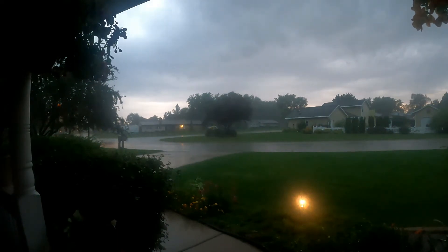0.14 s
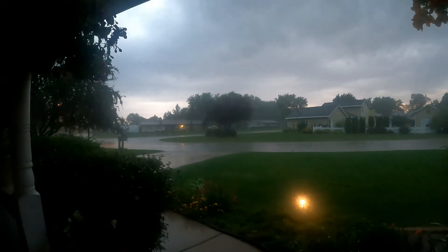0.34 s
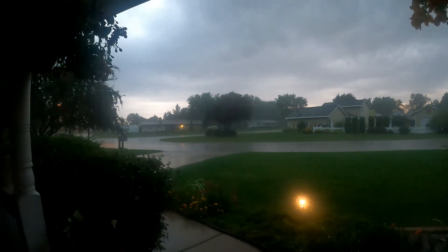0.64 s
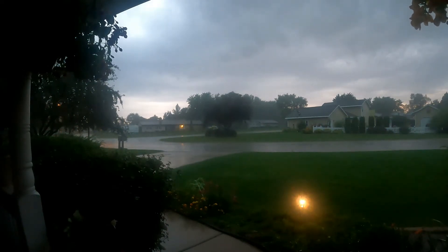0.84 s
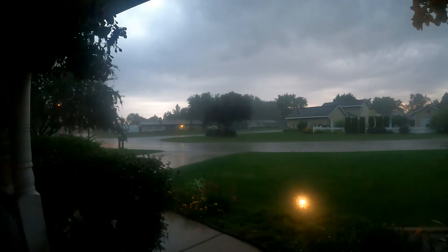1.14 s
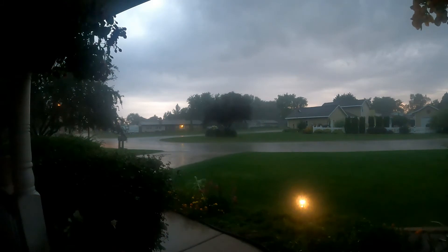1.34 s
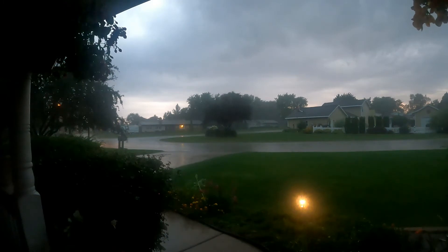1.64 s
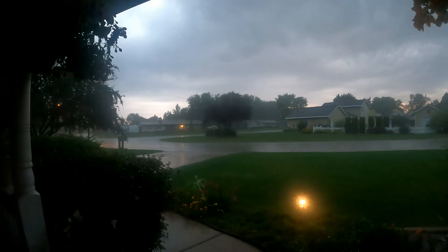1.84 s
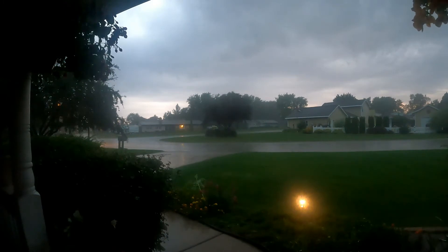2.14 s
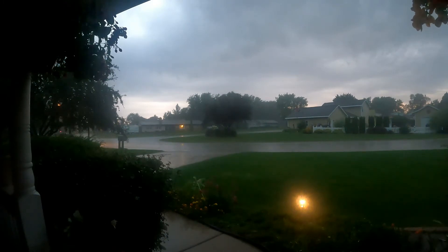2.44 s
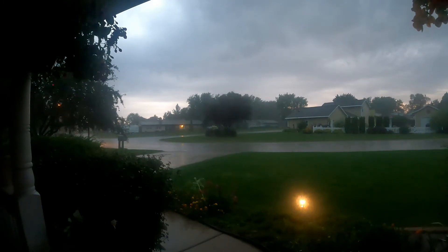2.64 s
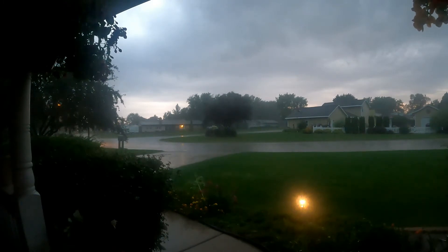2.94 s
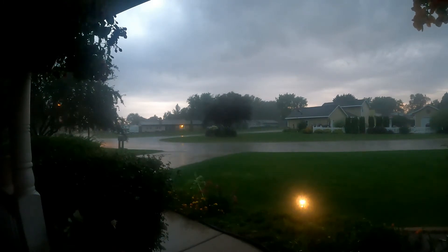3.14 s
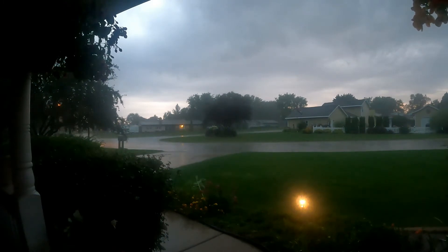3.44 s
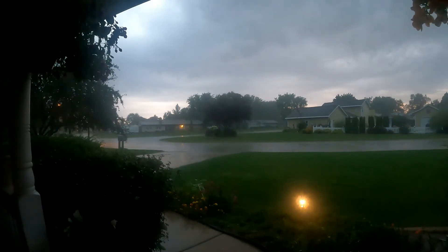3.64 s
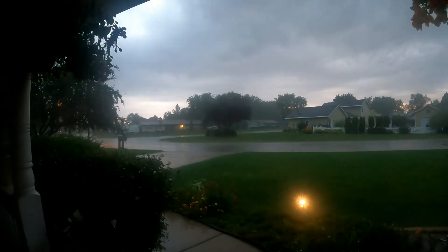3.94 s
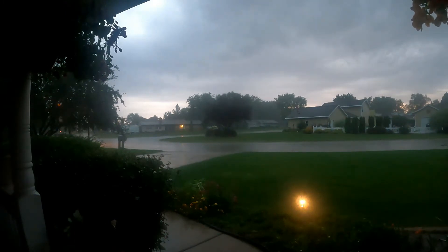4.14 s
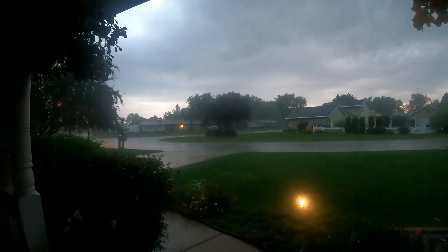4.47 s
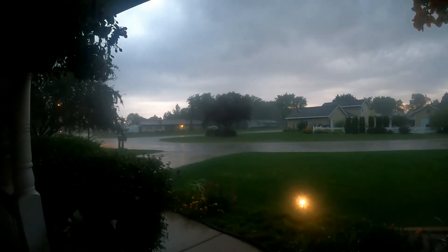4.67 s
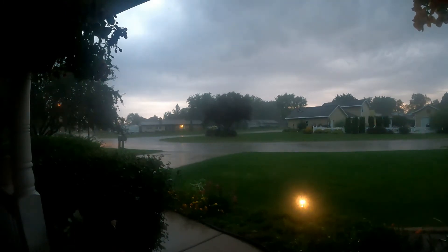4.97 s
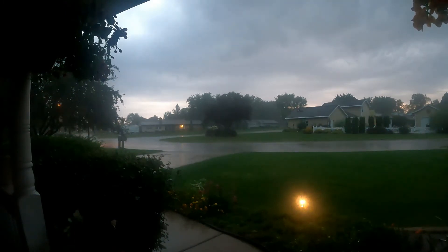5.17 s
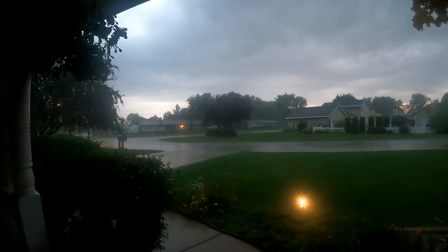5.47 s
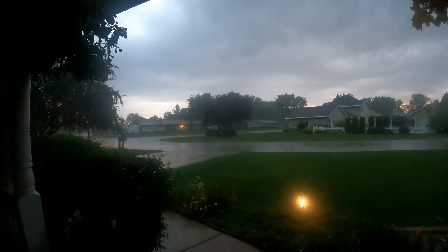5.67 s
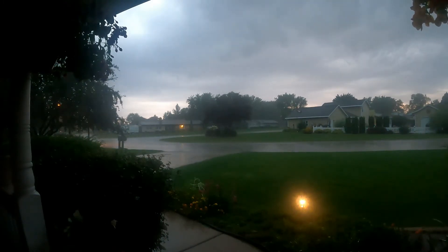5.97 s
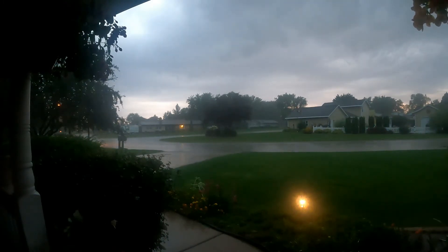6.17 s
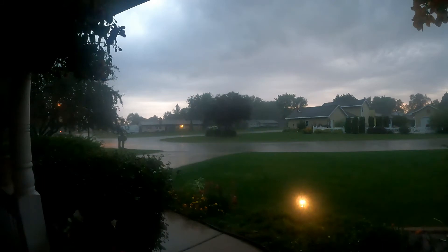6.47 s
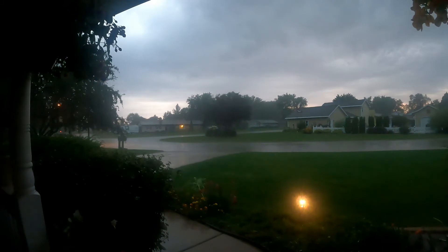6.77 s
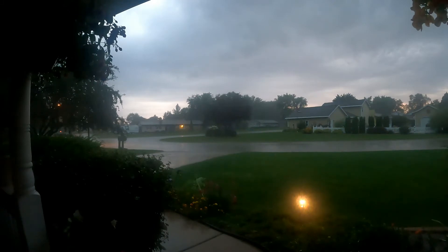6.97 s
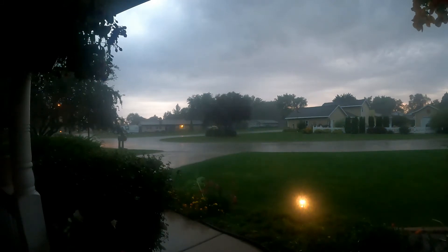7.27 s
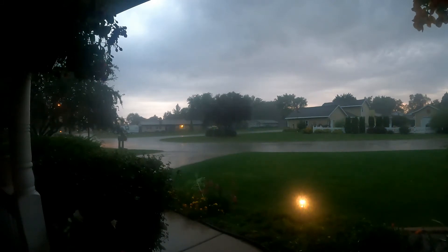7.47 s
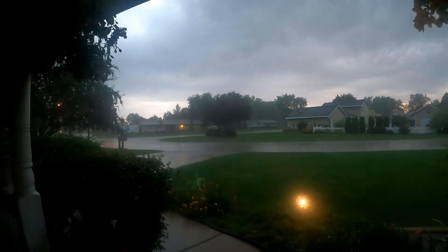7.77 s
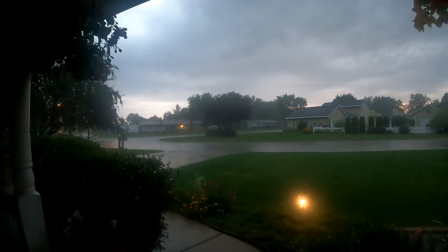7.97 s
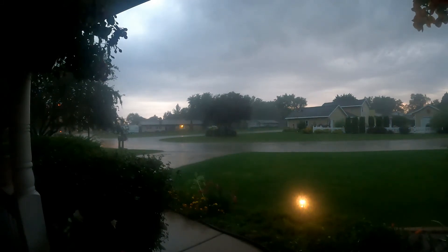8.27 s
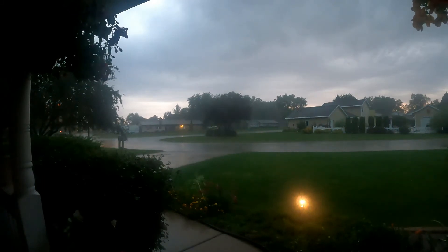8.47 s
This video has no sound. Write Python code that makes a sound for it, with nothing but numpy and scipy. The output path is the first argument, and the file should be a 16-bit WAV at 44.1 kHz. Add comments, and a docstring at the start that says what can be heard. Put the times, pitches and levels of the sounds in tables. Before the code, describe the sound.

Heard from a sheltered porch, heavy rain falls without pause on grass, leaves and wet paving: a broad soft hiss with fine, clumpy pattering. Close drops click and splash irregularly. After the first second distant thunder rolls in, deep and boomy, peaking near two and again near seven seconds, then fading.

```python
"""Heavy rain on a lawn, bushes and a street, heard from a covered porch.
Throughout, far drops merge into a hiss of flickering noise bands, and nearer ones patter as short rings.
Close drops click and splash from the first moment, hardest near 5.3 and 7.4 s.
Distant thunder, noise through low resonances, swells after the first second, peaks near 2 and 6.8 s
and fades at the end; it makes the recorder's gain control lower the rain."""
import sys
import numpy as np
from scipy import signal
from scipy.fft import rfft, irfft, next_fast_len
from scipy.io import wavfile
from scipy.ndimage import uniform_filter1d

SR = 44100
rng = np.random.default_rng(int(sys.argv[2]) if len(sys.argv) > 2 else 0)


def ratio(d):
    """dB to gain"""
    e = np.asarray(d, float) / 20
    return 10 ** e


def materialize(psi):
    """Save the field psi as 16-bit PCM at rate SR to the path in sys.argv[1].

    A 1-D psi becomes a single channel; in a 2-D psi each row is a channel.
    """
    bounded = np.clip(np.atleast_2d(psi).T, -1, 1)
    quanta = np.round(bounded * 32767).astype(np.int16)
    wavfile.write(sys.argv[1], SR, quanta)


N = 379701  # samples


def unit_power(x):
    """Normalization: scale a signal to a mean square of 1."""
    return x / np.sqrt(np.mean(x ** 2) + 1e-20)


def in_time(rows):
    """Linear interpolation: each column after the time becomes a curve with one value a sample."""
    seconds, *columns = np.transpose(rows)
    return [np.interp(np.arange(N) / SR, seconds, column) for column in columns]


def at_hz(points, hz):
    """Logarithmic frequency axis: interpolate a spectrum between its points."""
    point_hz, values = np.transpose(points)
    return np.interp(np.log(hz + 1), np.log(point_hz), values)


def drift(corner_hz):
    """Low-passed noise: two equal poles leave a slow random curve of spread 1."""
    step = 40  # samples between computed values
    pole = np.exp(-2 * np.pi * corner_hz * step / SR)
    noise = rng.standard_normal(N // step + 2002)
    slow = signal.lfilter([1], [1, -2 * pole, pole * pole], noise)[2000:]  # settled part
    return np.interp(np.arange(N) / step, np.arange(len(slow)), unit_power(slow))


def ring(x, hz, t60):
    """Damped resonance: a unit click starts a sine of height 1 that falls 60 dB in t60 seconds."""
    radius, angle = ratio(-60 / (t60 * SR)), 2 * np.pi * hz / SR
    return signal.lfilter([0, np.sin(angle)], [1, -2 * radius * np.cos(angle), radius ** 2], x + 1e-18)


def sides(db):
    """Interaural level difference: left and right gains that lie db apart."""
    return ratio(np.array([db / 2, -db / 2]))


# Reflections from porch walls, floor and ceiling.
# Each row: delay in seconds, left level in dB, right level in dB; both shift with echo_db.
PORCH_ECHOES = [(.0016, -8, -9), (.0042, -11, -10), (.0057, -11, -13), (.0093, -15, -14), (.0154, -17, -18),
                (.024, -20, -20)]


def porch(x, echo_db):
    """Early reflection: hard surfaces nearby return a few delayed, weaker copies."""
    out = x.copy()
    for delay_s, left_db, right_db in PORCH_ECHOES:
        lag = round(delay_s * SR)
        out[:, lag:] += ratio(echo_db) * ratio([[left_db], [right_db]]) * x[:, :-lag]
    return out


# Course of the rain before the gain control. Each row: time in seconds, level in dB,
# near patter over far hiss in dB, extra body of the hiss in dB.
DOWNPOUR_COURSE = [(0, -37.5, -15, 1), (1, -37, -9, -0.1), (2, -36.5, -9, 0.6), (3.5, -37, -8, 0),
                   (5, -37.5, -8, -.5), (6.5, -36, -13, -0.3), (7.3, -37, -8.5, -0.5),
                   (7.9, -36.5, -12, -0.5), (8.3, -38.5, -7.5, 0.1), (8.61, -38, -19, 0)]
# Relative colour of the rain at the microphone. Each row: frequency in Hz, density in dB per Hz.
RAIN_COLOUR = [(150, -17), (210, -11.5), (300, -9), (435, -12.5), (613, -12.5), (860, -13.5), (910, -9),
               (1360, -12.5), (1910, -12), (2420, -13.5), (7600, -17.5), (8000, -22), (12100, -30.5),
               (14000, -43.5), (15000, -44)]
# Lean of the rain to one side. Each row: frequency in Hz, left over right in dB.
RAIN_LEANING = [(60, -12), (120, 17), (240, 0.5), (470, 1.0), (940, 1.5), (1870, 2), (3730, 0.5),
                (7430, 0.5), (14800, 7.5)]
# Phase between the microphones. Each row: frequency in Hz, lead of left over right in radians.
LEFT_LEAD = [(0, 0.1), (2760, -0.93), (5080, 0.06), (15000, 0.0)]


def rain():
    """Spectral shaping: hiss and patter share one colour, one phase difference and one level."""
    size = next_fast_len(N)
    hz = np.arange(size // 2 + 1) * SR / size
    low_cut = hz ** 4 / (hz ** 4 + 140 ** 4)
    colour = ratio(at_hz(RAIN_COLOUR, hz)) * sides(at_hz(RAIN_LEANING, hz)) * low_cut
    lead = np.interp(hz, *np.transpose(LEFT_LEAD))
    colour = colour * np.exp(0.5j * lead * [[1], [-1]])
    level_db, patter_db, body_db = in_time(DOWNPOUR_COURSE)
    flat = hiss(body_db) + ratio(patter_db) * patter()
    coloured = irfft(rfft(flat, size) * colour, size)[:, :N]
    return ratio(level_db) * unit_power(coloured)


# Coherence of the two channels of hiss. Each row: frequency in Hz, left-right likeness from 0 to 1.
HISS_LIKENESS = [(60, 0.99), (120, 1.0), (240, 0.96), (470, 0.9), (940, 0.74), (1870, 0.7), (3730, 0.65),
                 (7430, 0.64), (14800, 0.26)]


def hiss(body_db):
    """Superposition: countless far drops sum to noise, whose octave bands flicker partly together."""
    shared_db, own_db = 0.5, 0.5  # spread of the flicker
    size = next_fast_len(N)
    hz = np.arange(size // 2 + 1) * SR / size
    mid, side = rfft(rng.standard_normal((2, size)))
    alike = at_hz(HISS_LIKENESS, hz)
    pair = np.sqrt(1 + alike) * mid + np.sqrt(1 - alike) * side * [[1], [-1]]
    out, together = 0, drift(7.3)
    for centre_hz in 125 * 2.0 ** np.arange(8):
        # triangular on an octave axis, so that neighbouring bands sum to a flat spectrum
        band = np.clip(1 - np.abs(np.log2((hz + 1) / centre_hz)), 0, 1)
        gain_db = shared_db * together + own_db * drift(14.0)
        if centre_hz in (1000, 2000):
            gain_db = gain_db + body_db
        out = out + ratio(gain_db) * irfft(pair * band, size)[:, :N]
    return unit_power(out)


PATTER_PER_S, PATTER_SPREAD_DB = 500, 4.0  # rate before it wavers; mean of the random sizes
LOW_CYCLES, HIGH_CYCLES = 17, 3.2  # low drops plop like bubbles, high ones tick
CLUMP_DB, CLUMP_HZ = 4.0, 6.0  # swing of the clumps and corner of their drift


def patter():
    """Random arrivals: nearer drops on leaves and paving each ring a few cycles at a pitch and place."""
    sizes = ratio(PATTER_SPREAD_DB * np.minimum(rng.exponential(1, N), 4)) * rng.choice([-1, 1], N)
    places = sides(2.7 * rng.standard_normal(N))
    pitches = np.geomspace(500, 13000, 14)  # Hz
    cycles = np.geomspace(LOW_CYCLES, HIGH_CYCLES, len(pitches))
    dealt = rng.integers(0, len(pitches), N)
    # leaves shed water in clumps, each range of pitch at its own moments
    ranges = np.array([drift(CLUMP_HZ) for _ in range(5)])
    clumps = ranges[dealt // 3, np.arange(N)]
    rate = PATTER_PER_S * ratio(2.5 * drift(5.0) + CLUMP_DB * clumps)
    born = rng.random(N) < rate / SR
    rings = 0
    for k, hz in enumerate(pitches):
        clicks = places * sizes * born * (dealt == k)
        # small drops are many and high; the weight keeps the power per Hz level
        weight = hz / np.sqrt(cycles[k])
        rings = rings + weight * ring(clicks, hz, cycles[k] / hz)
    return unit_power(porch(rings, echo_db=-2))


# Drops close by, before echoes and treble loss. Each row: start in seconds, click peak in dB,
# pitch in Hz, left over right in dB, splash relative to the click in dB.
CLOSE_DROPS = [(0.04, -35, 1000, 0, -4), (0.135, -32.5, 1010, 0, -11), (0.255, -38, 910, 3, -7),
               (1.146, -23.5, 8200, 6, -7), (1.527, -28, 5090, -3, -12), (1.852, -21, 10100, 6, -7),
               (2.139, -29.5, 955, 5, -8.5), (2.469, -19, 7200, -1, -20), (2.564, -30.5, 1950, 1, -2.5),
               (3.065, -30.5, 2140, 0, -7), (3.253, -29, 3320, 7, -8.5), (3.26, -30, 4000, 5, -8),
               (3.276, -28, 3200, 5, -11), (3.308, -31.5, 606, 3, -7), (3.567, -25, 3850, -8, -15),
               (3.882, -30.5, 3700, 6, -7), (3.922, -35, 4000, 3, -10), (4.24, -31, 7500, 3, -5),
               (4.282, -35, 645, 2, -10), (4.444, -27, 6050, 2, -12), (4.862, -28, 6050, 1, -9),
               (5.107, -20.5, 10180, 6, -8), (5.18, -26, 6130, 6, -9), (5.208, -33, 4030, 5, -11),
               (5.271, -32, 1800, -1, -19), (5.281, -11.5, 5730, 4, -19), (5.459, -35, 2600, 4, -4),
               (5.469, -34, 1920, 4, -7), (5.791, -28, 4000, 0, -14), (5.855, -35, 2820, 3, -4),
               (5.875, -28, 10180, 1, -8), (6.009, -30.5, 3550, 6, -5), (6.313, -29, 2220, 7, -6.5),
               (6.399, -25, 6500, 3, -11), (6.429, -27.5, 4280, 2, -9), (6.819, -20, 4500, -1, -17),
               (7.358, -13.5, 5040, 2, -23.5), (7.825, -26, 4500, 0, -18), (8.07, -35, 2200, 5, -5),
               (8.211, -33, 1280, 5, -8.5), (8.272, -28.5, 6000, 0, -6), (8.314, -21.5, 7040, 7, -12),
               (8.594, -28.5, 2830, -6, -14)]
# Damping of a close drop. Each row: pitch in Hz, length of its 60 dB decay in cycles.
DROP_CYCLES = [(600, 27), (3900, 23), (4300, 4), (5800, 5), (10000, 2.2)]
# Decay of the spray. Each row: pitch in Hz, time to fall 60 dB in seconds.
SPRAY_DECAY = [(600, 0.15), (2000, 0.23), (4000, 0.17), (6000, 0.085), (10000, 0.077)]
DROPLETS_PER_S = 900
SPLASH_CYCLES = 6.9  # at most; droplets vary in size, so the spray is broad in pitch


def drops():
    """Impact and decay: a click rings briefly, then droplets die away around the same pitch."""
    out, t = np.zeros((2, N)), np.arange(SR // 4) / SR
    for start_s, peak_db, hz, pan_db, splash_db in CLOSE_DROPS:
        cycles = at_hz(DROP_CYCLES, hz)
        click = ring(1.0 * (t == 0), hz, cycles / hz)
        droplets = (rng.random(len(t)) < DROPLETS_PER_S / SR) * rng.uniform(-1, 1, len(t))
        short = min(cycles, SPLASH_CYCLES) / hz
        spray = unit_power(ring(ring(droplets, hz, short), hz, short))
        splash = spray * ratio(splash_db - 60 * t / at_hz(SPRAY_DECAY, hz))
        drop = np.outer(sides(pan_db), ratio(peak_db) * (click + splash))
        at = round(start_s * SR)
        out[:, at:at + len(t)] += drop[:, :N - at]
    # the closest drops stand further above their echoes
    echoed = porch(out, echo_db=-7.5)
    # the microphone hears little of the highest treble
    return signal.sosfilt(signal.butter(2, 6900, fs=SR, output="sos"), echoed)


# The thunder's roll. Each row: time in seconds, level in dB (its swing about the mean is used),
# brightness in dB by which the higher booms rise or sink.
THUNDER_ROLL = [(0.0, -35.5, -1), (0.5, -29, -3.5), (0.88, -32.5, -1), (1.0, -22.5, -4), (1.3, -26.5, 2),
                (1.55, -21, -4), (1.8, -24.5, 4.5), (2.05, -16, -0.5), (2.13, -34, 7), (2.2, -20.5, 2),
                (2.5, -21, 1), (2.75, -24, -2.5), (2.97, -24, 4.5), (3.15, -20, -1.5), (3.65, -22.5, 1),
                (4.2, -23, -0.5), (4.5, -19.5, -1.5), (5.0, -19, -2), (5.55, -21.5, -2.5),
                (5.82, -26.5, 0.5), (6.1, -22, 0), (6.33, -22.5, -2.5), (6.8, -14.5, -6.5),
                (7.1, -18.5, -4.5), (7.65, -28.5, 1), (7.85, -22, -3), (8.42, -26.5, -2), (8.61, -31, -4)]
# Resonances of the rumble under the porch roof. Each row: frequency in Hz, width of each filter pass
# in Hz, mean level in dB before the gain control, share of the roll's swing, share of its brightness.
PORCH_BOOMS = [(48.4, 23, -23, 1.06, 0.01), (89, 28.3, -28.5, 0.93, 1.4), (134.4, 62, -33.5, 0.4, 0.9),
               (209, 98, -44.5, 0.16, 0.18)]
EVENNESS = 0.17  # share 0-1 of the rumble's chance wavering that is held level


def thunder():
    """Resonance: noise passes twice through each boom, is partly levelled and follows the roll."""
    out = 0
    roll_db, bright_db = in_time(THUNDER_ROLL)
    swing_db = roll_db - roll_db.mean()
    for hz, width_hz, mean_db, follows, brightens in PORCH_BOOMS:
        t60 = np.log(1000) / (np.pi * width_hz)
        noise = rng.standard_normal(N + SR)  # the first second lets the resonance settle
        boom = unit_power(ring(ring(noise, hz, t60), hz, t60)[SR:])
        power = uniform_filter1d(boom ** 2, round(1.5 * SR / hz))
        evened = boom / (power + 0.034) ** (EVENNESS / 2)
        level_db = mean_db + follows * swing_db + brightens * bright_db
        out = out + ratio(level_db) * unit_power(evened)
    return out


def scene():
    """Coherence: thunder reaches both microphones almost alike; the rain is spread around them."""
    unlike = ratio(-31) * thunder() * [[1], [-1]]
    return rain() + drops() + thunder() + unlike


def band_limit(x):
    """A steep low-pass at the top of the band."""
    return signal.sosfilt(signal.butter(12, 15380, fs=SR, output="sos"), x)


KNEE_DB, SQUEEZE = -27, 0.35  # gain falls SQUEEZE dB for each dB of level above the knee
LISTEN_S, RELEASE_DB_PER_S = 0.15, 1.5
MAKE_UP_DB = 2


def record(dry):
    """Compression: deep bass is lost; loud sound lowers the gain quickly, and it climbs back slowly."""
    heard = signal.sosfilt(signal.butter(2, 37, "high", fs=SR, output="sos"), dry)
    power = uniform_filter1d(np.mean(heard ** 2, axis=0), round(LISTEN_S * SR))
    over_db = np.maximum(10 * np.log10(power + 1e-12) - KNEE_DB, 0) * SQUEEZE
    climb_db = RELEASE_DB_PER_S * np.arange(N) / SR
    # a running maximum on a rising ramp holds each cut, then releases it at a steady rate
    held_db = np.maximum.accumulate(over_db + climb_db) - climb_db
    return band_limit(heard * ratio(MAKE_UP_DB - held_db))


dry = scene()
out = record(dry)
materialize(out)
```